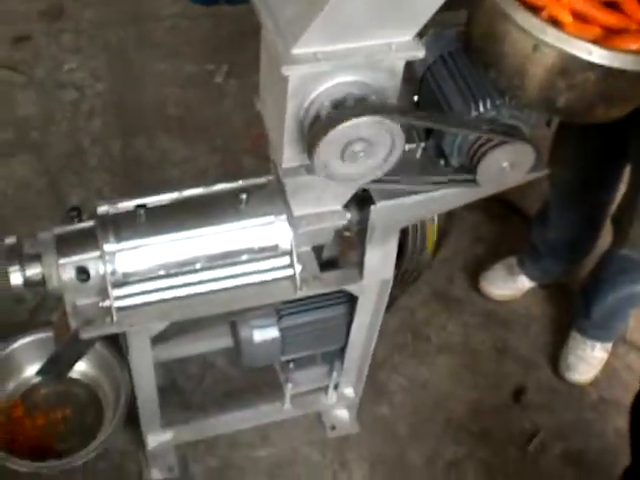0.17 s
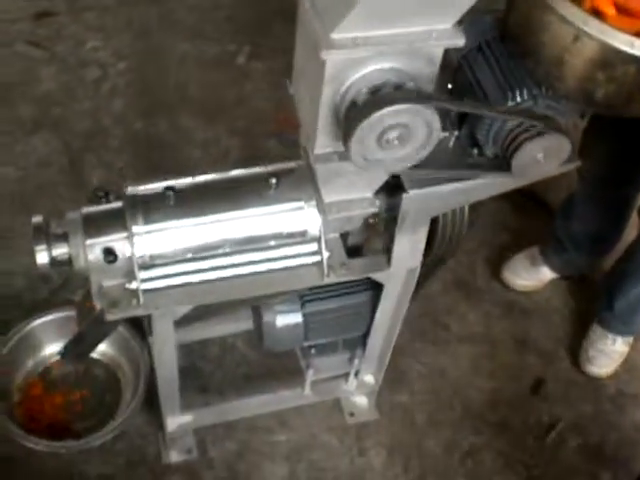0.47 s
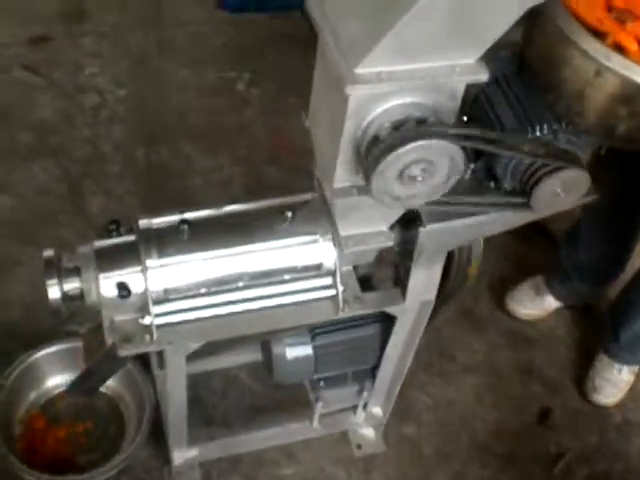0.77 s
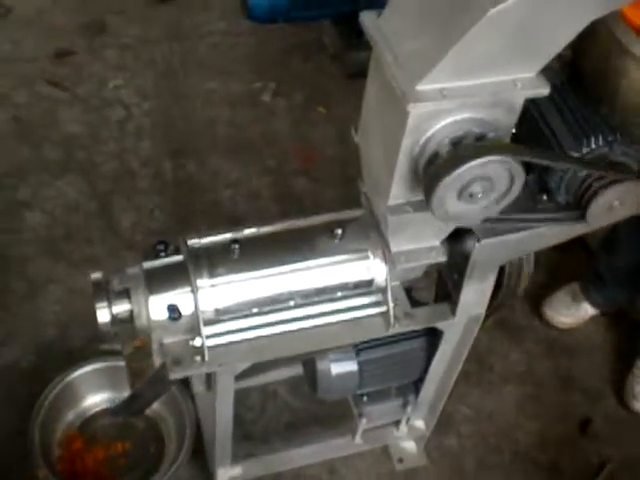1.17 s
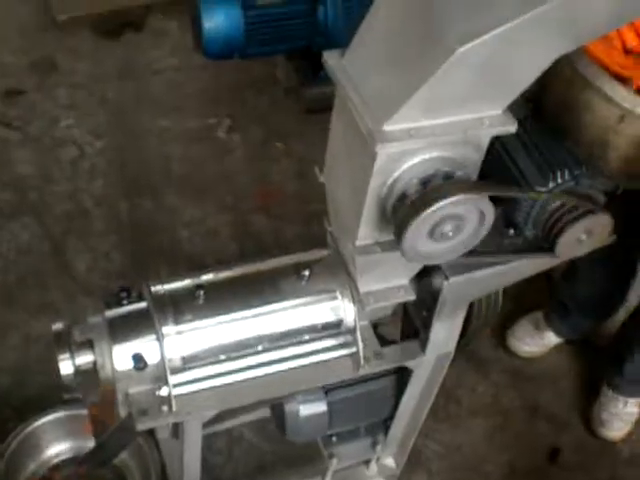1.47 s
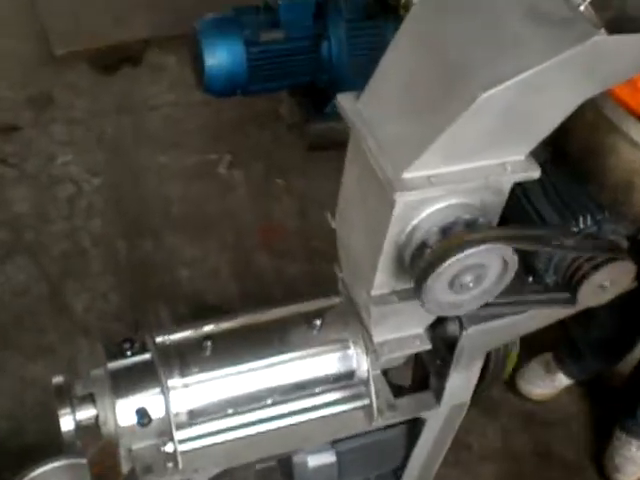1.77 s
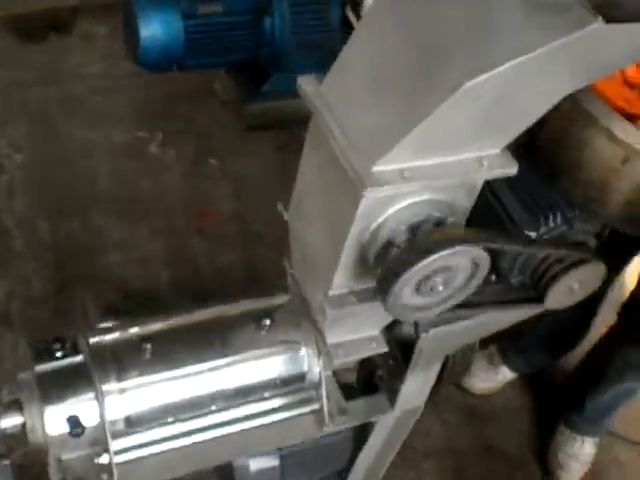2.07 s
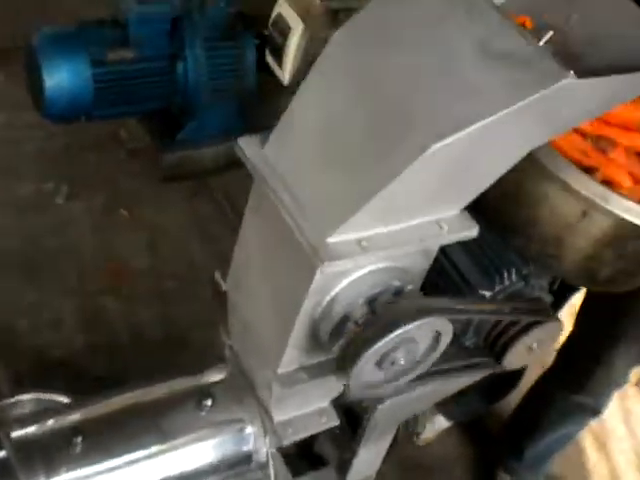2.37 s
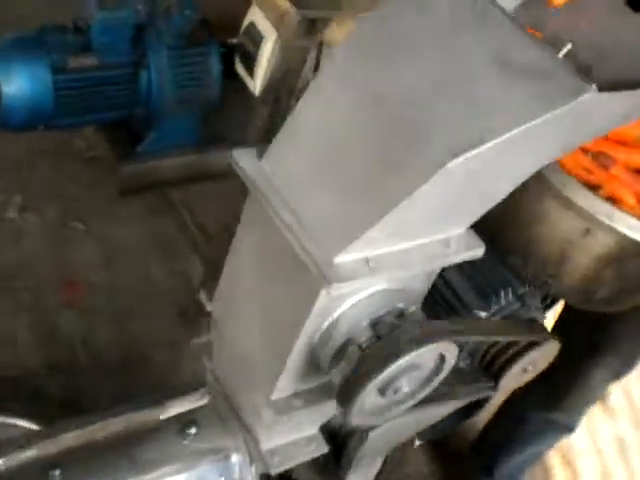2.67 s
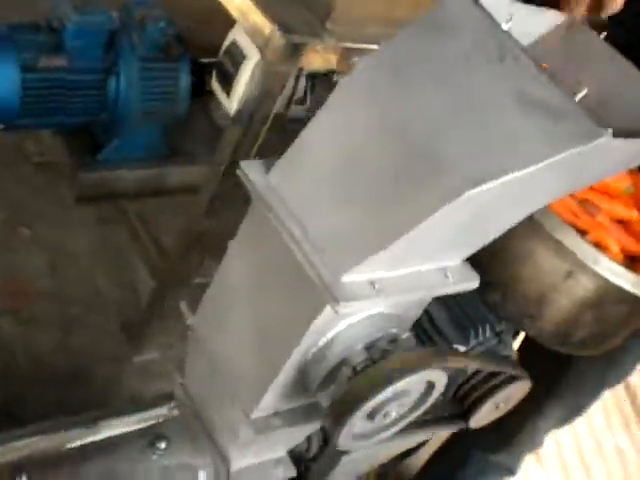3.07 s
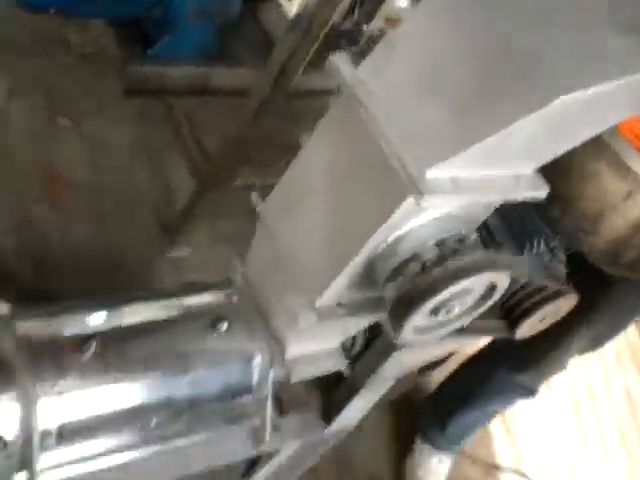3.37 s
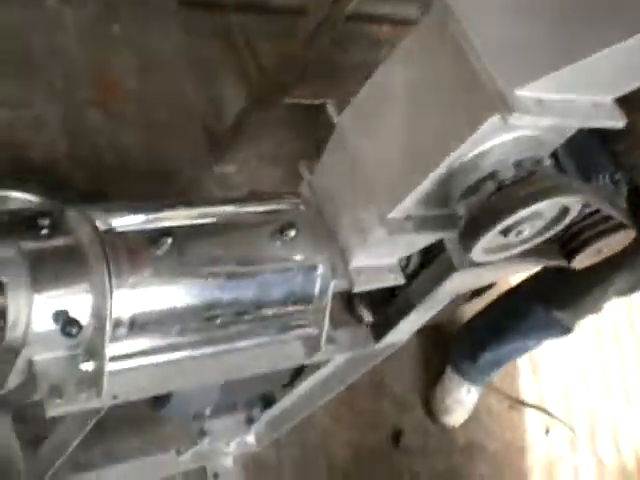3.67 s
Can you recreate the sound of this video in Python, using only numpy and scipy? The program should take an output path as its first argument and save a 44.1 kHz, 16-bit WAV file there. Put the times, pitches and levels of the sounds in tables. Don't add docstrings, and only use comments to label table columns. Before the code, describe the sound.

Loud, rough crusher roar with motor and gear hum, constant clattering pieces and irregular hollow steel knocks; metallic rattling peaks around one second, cutting scrapes come later, and the hardest bangs clip and briefly duck the close handheld microphone.

```python
import sys
import numpy as np
from scipy import signal
from scipy.fft import rfft, irfft
from scipy.io import wavfile
from scipy.ndimage import uniform_filter1d

SR = 44100
rng = np.random.default_rng(int(sys.argv[2]) if len(sys.argv) > 2 else 0)


def int16_out(signal):
    q = np.round(np.clip(np.atleast_2d(signal).T, -1, 1) * 32767)
    wavfile.write(sys.argv[1], SR, q.astype(np.int16))


def invert_db(level):
    return 10 ** (np.asarray(level, dtype=float) / 20)


N = 168462

# start in seconds, level in dB, ring in Hz,
# gain drop it causes in dB (none if negative).
KNOCK_EVENTS = [(0.125, -8.5, 965, -1.5), (0.328, -5.5, 670, 1), (0.538, -4, 622, -13.5),
                (0.684, -9.5, 554, -4), (1.101, -7, 695, 0), (1.381, -1.5, 970, 0), (1.63, 0.5, 918, 1),
                (1.983, -4.5, 720, -4), (2.122, -5.5, 713, 2.5), (2.381, -1.5, 769, 2.5), (2.44, 0, 739, 5),
                (2.487, 1.5, 660, 1), (2.527, 2.5, 662, -2), (2.599, -5.5, 703, 3), (2.628, 0, 726, -2),
                (2.749, 0.5, 733, 6.5), (3.079, -1, 595, 3), (3.11, -4.5, 694, 2), (3.411, -7, 572, -7.5),
                (3.576, -4.5, 616, 2.5), (3.656, -5.5, 862, 2.5)]
# start in seconds, level in dB, ring in Hz, gain drop in dB.
BANG_EVENTS = [
    (.4212, .3, 800, 2),
    (.4885, 3, 700, 10.5),
    (1.563, 2.2, 760, 10),
    (2.185, .7, 723, 5),
    (2.2937, 7, 720, 13),
    (3.0293, .6, 726, 4),
    (3.1805, 1.8, 700, 5),
    (3.3292, 2.15, 700, 10),
]
# pitch in Hz, level in dB, time to fall by 60 dB in seconds.
SCREEN_MODES = [(2500, -2, 0.025), (3188, 1, 0.025), (3380, 2, 0.022), (3609, 6, 0.03), (3720, -3, .015),
                (4330, -3.5, 0.022)]


def evened(x):
    return x / np.sqrt(np.mean(x ** 2) + 1e-20)


def read(points, hz):
    f, value = np.transpose(points)
    return np.interp(np.log(hz + 1), np.log(f + 1), value)


def walk(t, column):
    # time in seconds, roar level in dB, share of the hopper side from 0 to 1,
    # rattle level in dB, grinding brightness in dB.
    path = [(0, -12.5, 0.17, -54, -1.5), (.25, -13, 0.3, -30.5, -3.5), (.47, -10.5, 0.3, -33, -2),
            (.6, -16, 0.04, -31, -2.5), (.8, -15.5, 0.3, -25.5, -1.5), (0.999, -17.5, 0.1, -24, 1),
            (1.199, -15, 0.1, -21, -0.5), (1.338, -16, 0.1, -26, -2.5), (1.458, -15.5, 0.2, -33, -2.5),
            (1.751, -11, 0.2, -30.5, -3), (1.998, -16, 0.4, -46, 1.5), (2.249, -10.5, 0.2, -49, 2.5),
            (2.599, -13, 0.51, -28, -1), (2.9, -11, 0.47, -39, 5.5), (3.2, -11, 0.6, -39.5, -0.5),
            (3.5, -14.5, 0.5, -36, 2.5), (3.82, -16, 0.4, -27.5, 2.5)]
    rows = np.array(path)
    return np.interp(t, rows[:, 0], rows[:, column])


def ring(hz, t60, rise=0.00015):
    t = np.arange(3000) / SR
    return (1 - np.exp(-t / rise)) * invert_db(-60 * t / t60) * np.sin(2 * np.pi * hz * t)


def roar():
    # frequency in Hz, level in dB per Hz.
    press_side = [(59, -77), (100, -39.5), (351, -8), (462, -25.5), (579, -5), (1000, -5.5), (1100, -11.5),
                  (3630, -22.5), (4700, -49.5), (6110, -61.5), (10300, -120)]
    # frequency in Hz, level in dB per Hz.
    hopper_side = [(59, -64.5), (100, -46.5), (419, -0.5), (702, -0.5), (1000, -1.5), (1120, 4.5),
                   (1600, -15.5), (2390, -18.5), (4700, -38.5), (6110, -72), (10300, -120)]
    # pitch in Hz, width in Hz,
    # dB over the roar from the press side, dB over it from the hopper side.
    panels = [(280, 89, 2, -2.5), (358, 8.9, 4, -2.5), (532, 66, 3.5, 10.5), (715, 42, 0, 10.5),
              (1008, 85, 6, -3), (1363, 110, 14, -15), (2350, 370, -7.5, 15)]
    patch_db, flicker_db, swell_db = 1.47, 1.83, 0.3
    grind_hz = 1500

    frames, hz = N // 128 + 5, np.fft.rfftfreq(1024, 1 / SR)
    t = np.arange(frames) * 128 / SR
    real, imaginary, patches = rng.standard_normal((frames, 513, 3)).T
    patches = evened(uniform_filter1d(uniform_filter1d(patches, 10, 0), 14, 1))
    flicker = evened(uniform_filter1d(rng.standard_normal(frames), 5))
    waves = [np.sin(2 * np.pi * (f * t + rng.random())) / np.sqrt(f) for f in np.geomspace(2, 20, 24)]
    swell = evened(sum(waves))

    share = np.clip(walk(t, column=2), 0, 1)
    colour_db = np.outer(read(press_side, hz), 1 - share) + np.outer(read(hopper_side, hz), share)
    power = invert_db(2 * colour_db)
    for f, width, press_db, hopper_db in panels:
        resonance = 1 / (1 + (2 * (hz - f) / width) ** 2)
        power = power * (1 + np.outer(resonance, invert_db(2 * (press_db + share * (hopper_db - press_db)))))
    treble = 1 / (1 + (grind_hz / (hz + 1)) ** 6)
    power = power / power.sum(0) * invert_db(2 * np.outer(treble, walk(t, column=4)))
    unsteady_db = patch_db * patches + flicker_db * flicker + swell_db * swell
    spectrum = (real + 1j * imaginary) * np.sqrt(power) * invert_db(unsteady_db)
    return evened(signal.istft(spectrum, nperseg=1024, noverlap=896)[1][:N])


def load_surges(t):
    # time in seconds, change in dB.
    surges = [(.03, -3.5), (.33, 0.5), (.4, -3), (.459, -4), (.575, 8), (.603, -5), (.62, 3), (.647, -4),
              (.708, 4), (.75, -3), (.795, -0.5), (.84, 2), (.93, 1), (1.061, -0.5), (1.117, 2.5),
              (1.174, -3.5), (1.27, 0), (1.393, 3.5), (1.45, 3.5), (1.741, -2), (1.8, -2), (1.903, -1),
              (1.989, 3.3), (2.218, -0.2), (2.531, 1.5), (2.582, -3), (2.841, -3), (2.913, -5),
              (3.06, -3.5), (3.22, -1), (3.29, -0.5), (3.315, 2), (3.47, -2), (3.571, 3), (3.64, -4),
              (3.7, 2), (3.745, -4), (3.79, -1)]
    surge_s = 0.022
    return sum(db * np.exp(-((t - s) / surge_s) ** 2) for s, db in surges)


def tones():
    # pitch in Hz, width in Hz, dB from the press side, dB from the hopper side.
    hums = [(236.5, 2.5, -44, -35), (363, 12, -31, -39), (398.4, 4, -33, -37), (527, 7, -42, -31),
            (576, 4, -40, -27), (636, 7, -36, -30), (716, 9, -27, -24), (770, 7, -40, -31),
            (829, 4, -42, -26), (985, 25, -27, -36), (1122, 12, -40, -26), (1250, 18, -33, -40),
            (1357, 10, -33, -32)]
    t, out = np.arange(N) / SR, np.zeros(N)
    share = np.clip(walk(t, column=2), 0, 1)
    for hz, width, press_db, hopper_db in hums:
        memory = np.exp(-np.pi * width / SR)
        noise = rng.standard_normal(N) + 1j * rng.standard_normal(N)
        wander = signal.lfilter([1], [1, -memory], noise)
        tone = evened((wander * np.exp(2j * np.pi * hz * t)).real)
        out += invert_db(press_db + share * (hopper_db - press_db)) * tone
    return out


def taps():
    taps_per_s, level_db, spread_db, t60_s = 90, -10.5, 3, 0.022
    hit = rng.random(N) < taps_per_s / SR
    size = invert_db(spread_db * np.minimum(rng.exponential(1, N), 3)) * hit
    spot = rng.integers(0, 16, N)
    out = np.zeros(N)
    for k, hz in enumerate(np.geomspace(500, 1350, 16)):
        out += signal.oaconvolve(size * (spot == k), ring(hz, t60_s, rise=0.00056))[:N]
    return invert_db(level_db) * evened(out)


def rattle():
    shaft_hz, jitter_turns, strike_spread_db = 44.7, 0.08, 2.5
    chatter_per_s, chatter_db, burst_s = 900, -3, 0.0063
    clump_db, loose, level_db = 3, 0.051, -7
    wobble = evened(uniform_filter1d(rng.standard_normal(N), 900))
    turns = np.arange(N) * shaft_hz / SR + jitter_turns * wobble
    strike = np.diff(np.maximum.accumulate(np.floor(turns)), prepend=0) > 0
    out = np.zeros(N)
    for hz, db, t60 in SCREEN_MODES + SCREEN_MODES:
        hits = strike * invert_db(strike_spread_db * rng.standard_normal(N))
        burst = signal.lfilter([1], [1, -np.exp(-1 / (burst_s * SR))], hits)
        scrape = evened(burst * rng.standard_normal(N))
        chatter = evened(rng.standard_normal(N) * (rng.random(N) < chatter_per_s / SR))
        drive = scrape + invert_db(chatter_db) * chatter
        clump = evened(uniform_filter1d(rng.standard_normal(N), 2500))
        mode = ring(hz * (1 + loose * rng.uniform(-0.76, 1)), t60)
        out += invert_db(db + clump_db * clump) * evened(signal.oaconvolve(drive, mode)[:N])
    return invert_db(level_db + walk(np.arange(N) / SR, column=3)) * evened(out)


def strikes():
    # start in seconds, peak in dB.
    hit_list = [(0.2123, -27), (0.2333, -22), (0.3061, -26.5), (0.327, -25.5), (0.356, -25), (0.381, -22.5),
                (0.4493, -32), (0.4885, -20.5), (0.533, -28), (0.568, -19.5), (0.5813, -22), (0.6597, -18),
                (0.6865, -26), (0.7127, -23), (0.8279, -21.5), (0.8638, -20), (0.896, -24.5), (0.9114, -15),
                (0.932, -19), (0.9521, -20.5), (0.999, -15.5), (1.023, -10.5), (1.0482, -17.5),
                (1.0688, -18), (1.0917, -20.5), (1.1162, -16), (1.1392, -20), (1.159, -17), (1.1784, -15.5),
                (1.2008, -14.5), (1.219, -15), (1.243, -16), (1.2595, -12.5), (1.3102, -16.5),
                (1.331, -16.5), (1.3594, -20), (1.3856, -18), (1.4303, -21), (1.432, -20), (1.4964, -23),
                (1.5637, -16.5)]
    level_db, hold_s = -1, 0.004
    hits = np.zeros(N)
    for s, db in hit_list:
        hits[round(s * SR)] = invert_db(db + level_db)
    fading = signal.lfilter([1], [1, -np.exp(-1 / (hold_s * SR))], hits)
    scrapes = fading * rng.standard_normal((len(SCREEN_MODES), N))
    out, energy = np.zeros(N), 0
    for scrape, (hz, db, t60) in zip(scrapes, SCREEN_MODES):
        mode = ring(hz, t60)
        out += invert_db(db) * signal.oaconvolve(scrape, mode)[:N]
        energy += invert_db(2 * db) * np.sum(mode ** 2)
    return out / np.sqrt(energy)


def knocks(table, t60=0.037, rise=0.00067):
    overtone, overtone_db = 1.8, -13
    out = np.zeros(N + 3000)
    for s, db, hz, *_ in table:
        at = round(s * SR)
        shape = ring(hz, t60, rise) + invert_db(overtone_db) * ring(hz * overtone, t60, rise)
        out[at:at + 3000] += invert_db(db) * shape / abs(shape).max()
    return out[:N]


def nudges():
    # start in seconds, level in dB, ring in Hz.
    light_knocks = [(0.065, -3.5, 746), (0.371, -6, 653), (0.495, 1.5, 936), (0.658, -3.5, 954),
                    (1.021, -5.5, 985), (1.25, -9, 726), (1.444, -3.5, 726), (1.68, -8.5, 741),
                    (1.724, -2, 791), (1.805, -7, 506), (1.94, -3, 673), (2.168, -4.5, 715),
                    (2.261, -2, 1008), (2.4, -3.5, 1057), (2.689, -4, 569), (2.904, -2.5, 849),
                    (3.006, -3, 804), (3.473, -9.5, 765), (3.558, 0, 581), (3.598, -1.5, 860),
                    (3.679, -2, 842), (3.722, -0.5, 859)]
    return invert_db(-3) * knocks(light_knocks)


def brief_scrapes():
    # start in seconds, level in dB, ring in Hz.
    scrape_list = [(0.33, -18.5, 2680), (0.3845, -28, 2290), (0.5687, -19.5, 2670), (1.3312, -10, 3150),
                   (1.8178, -14, 2260), (2.0727, -9, 2330), (2.3972, -9.5, 2500), (2.5998, -12.5, 2500),
                   (2.6732, -17, 2355), (2.7736, -15.5, 2270), (2.8975, -16.5, 2390), (3.05, -11.5, 2780),
                   (3.1272, -5, 2370), (3.2605, -15, 2350), (3.466, -14, 2740), (3.6007, -20, 2380),
                   (3.7184, -17.5, 2277)]
    t60_s, hold_s, level_db = 0.006, 0.012, -5
    out, t = np.zeros(N + 5000), np.arange(2000) / SR
    for s, db, hz in scrape_list:
        at = round(s * SR)
        scrape = rng.standard_normal(2000) * np.exp(-t / hold_s)
        shape = signal.oaconvolve(scrape, ring(hz, t60_s))
        out[at:at + len(shape)] += invert_db(db + level_db) * shape / abs(shape).max()
    return out[:N]


def rumble(x):
    level_db, top_hz, skew_db = -59, 70.5, -3
    overload = evened(uniform_filter1d(x ** 2, 600)) ** 2
    drive = rng.standard_normal(N) * (1 + invert_db(skew_db) * overload)
    return invert_db(level_db) * evened(signal.sosfilt(signal.butter(2, top_hz, fs=SR, output="sos"), drive))


def hiss(x):
    # frequency in Hz, level in dB per Hz.
    bands = [(5000, -9), (6800, -8), (8500, -5), (9600, 0), (10700, -8), (11700, -1), (12800, -7),
             (15000, -6)]
    level_db, follow = -84, 1.3
    colour = invert_db(read(bands, np.fft.rfftfreq(N, 1 / SR)))
    noise = evened(irfft(rfft(rng.standard_normal(N)) * colour, N))
    loudness = abs(uniform_filter1d(x ** 2, 1500))
    return invert_db(level_db) * noise * evened(loudness ** (follow / 2))


def scene():
    soft_top, firm_top = 0.85, 0.74
    t = np.arange(N) / SR
    machines = invert_db(walk(t, column=1)) * (roar() + taps()) + tones() + rattle()
    steady = invert_db(load_surges(t)) * machines + brief_scrapes() + strikes()
    steady = soft_top * np.tanh(steady / soft_top)
    steady = steady + knocks(KNOCK_EVENTS) + nudges()
    steady = steady / (1 + (abs(steady) / firm_top) ** 6) ** (1 / 6)
    drowned = 1 - 0.6 * sum(np.exp(-((t - s - 0.002) / 0.004) ** 2) for s, *_ in BANG_EVENTS)
    return (steady * drowned + knocks(BANG_EVENTS, t60=0.045, rise=0.001))[None]


def low_pass(x):
    return signal.sosfilt(signal.butter(12, 15830, fs=SR, output="sos"), x)


def record(dry):
    react_s, drop_s, recover_s = 0.0025, 0.002, 0.05
    edge_hz, shelf_hz, shelf = 4750, 4250, invert_db(-2.5)
    clip_top, offset = 1.0, -0.004
    t, drop_db = np.arange(N) / SR, np.zeros(N)
    for s, _, _, db in KNOCK_EVENTS + BANG_EVENTS:
        since = np.maximum(t - s - react_s, 0)
        onset = np.sin(np.pi / 2 * np.minimum(since / drop_s, 1)) ** 2
        drop_db += max(db, 0) * onset * np.exp(-since / recover_s)

    corners = [0, shelf_hz, shelf_hz + 200, edge_hz - 300, edge_hz + 300, SR / 2]
    edge = signal.firwin2(301, corners, [1, 1, shelf, shelf, 0, 0], fs=SR, window=("kaiser", 8))
    narrow = signal.oaconvolve(dry, edge[None], "same")
    narrow = signal.sosfilt(signal.butter(3, 158, "high", fs=SR, output="sos"), narrow)

    loud = np.clip(narrow * invert_db(-drop_db), -clip_top, clip_top)
    loud = signal.sosfilt(signal.butter(1, 11000, fs=SR, output="sos"), loud)
    thinned = signal.sosfilt(signal.butter(1, 90, "high", fs=SR, output="sos"), loud)
    loud = np.clip(thinned + rumble(loud) + offset, -1.05, 1.05)
    return low_pass(loud + hiss(loud))


dry = scene()
out = record(dry)
int16_out(out)
```